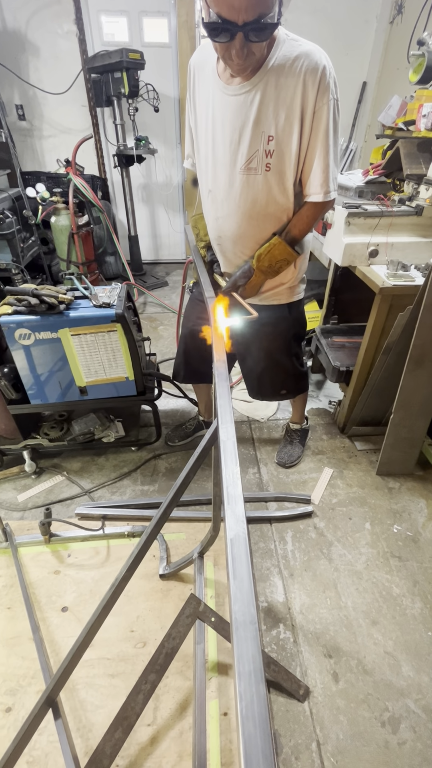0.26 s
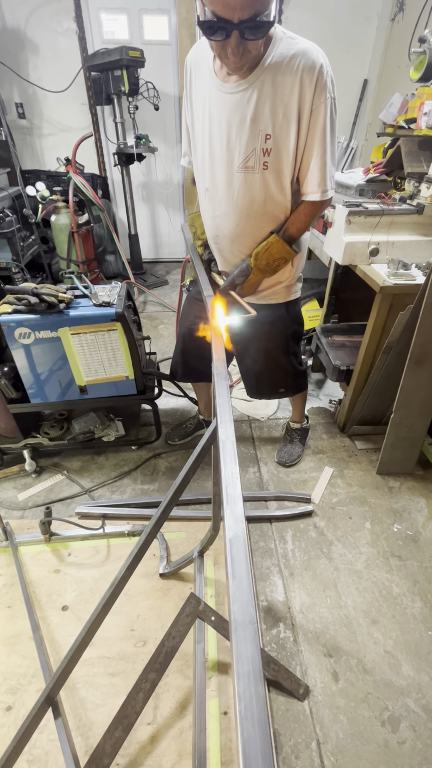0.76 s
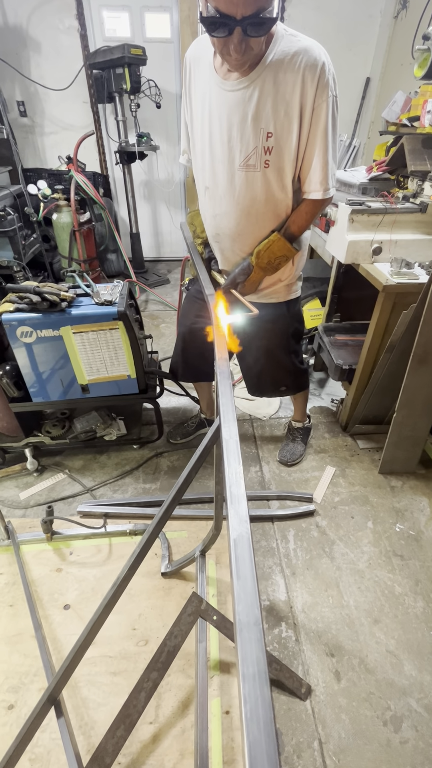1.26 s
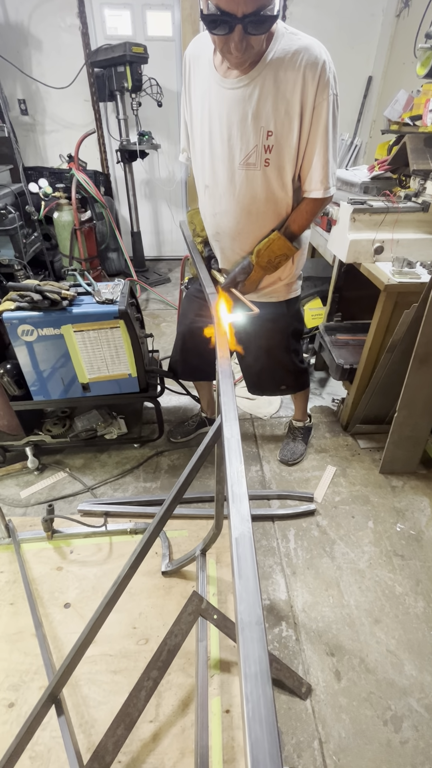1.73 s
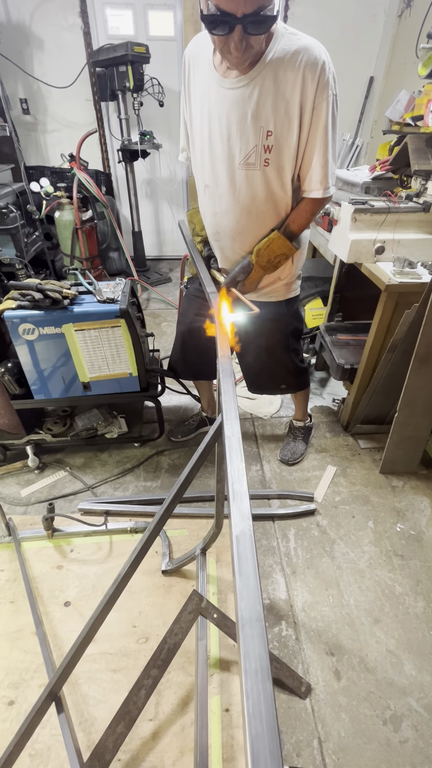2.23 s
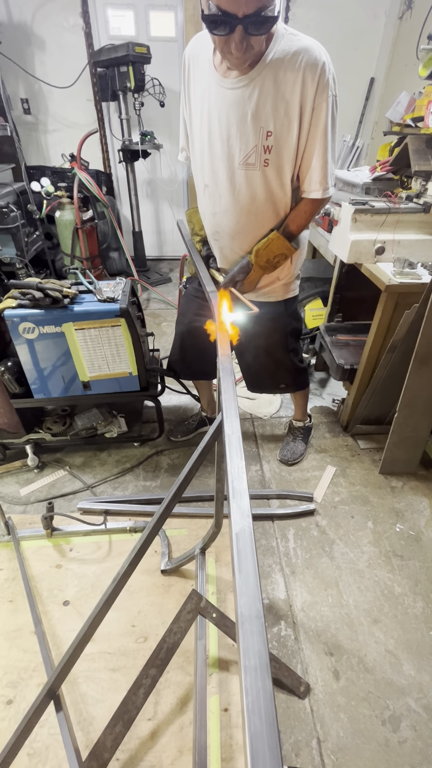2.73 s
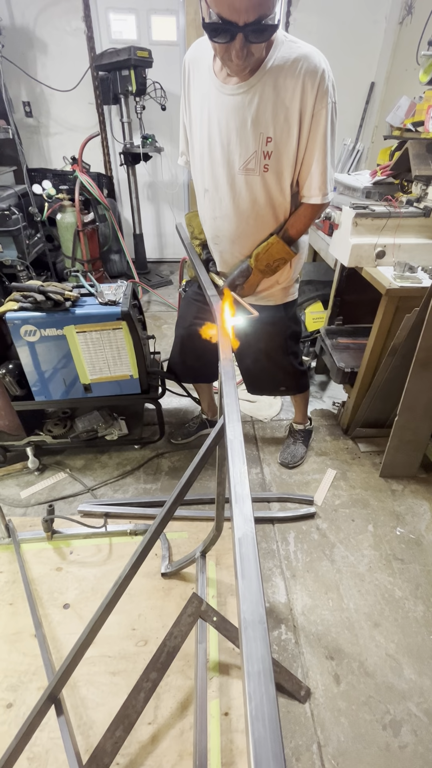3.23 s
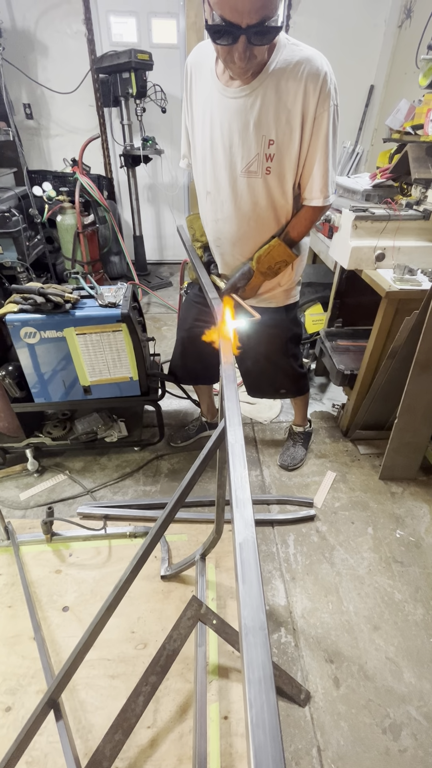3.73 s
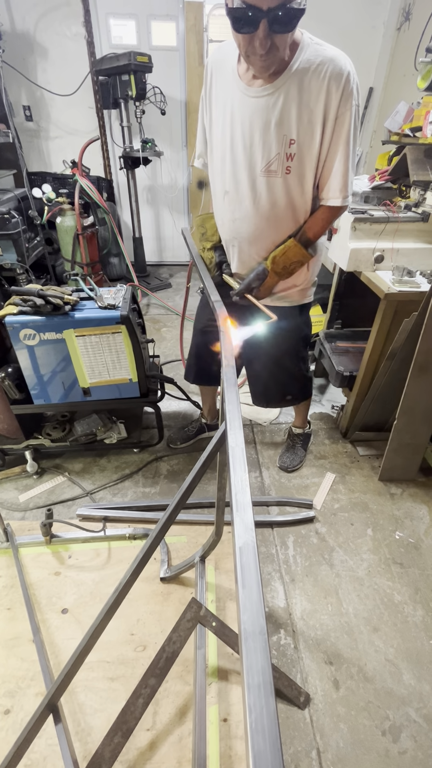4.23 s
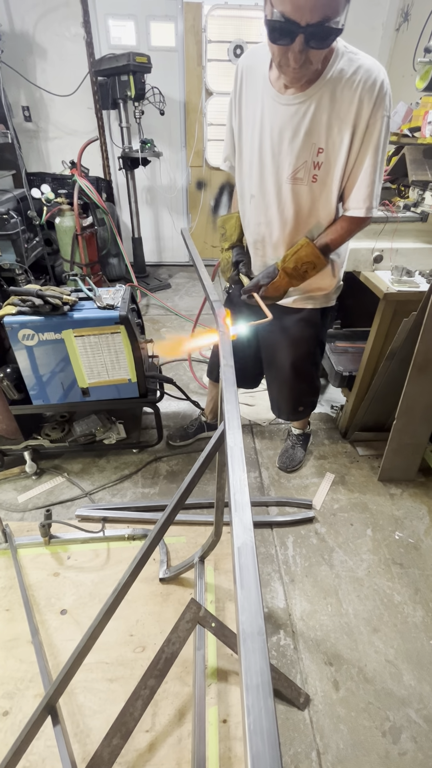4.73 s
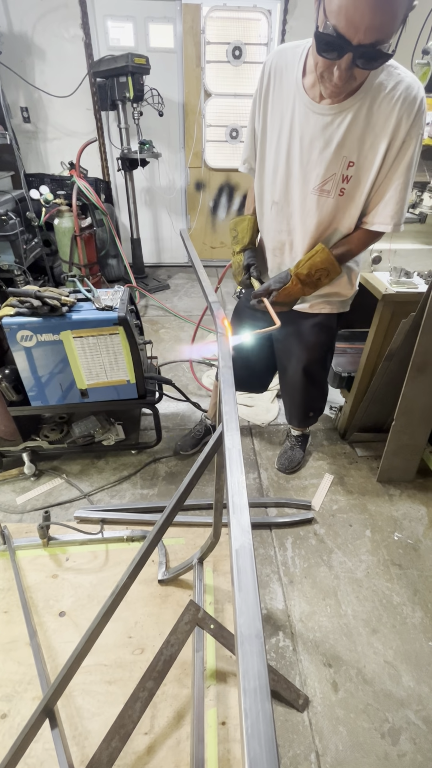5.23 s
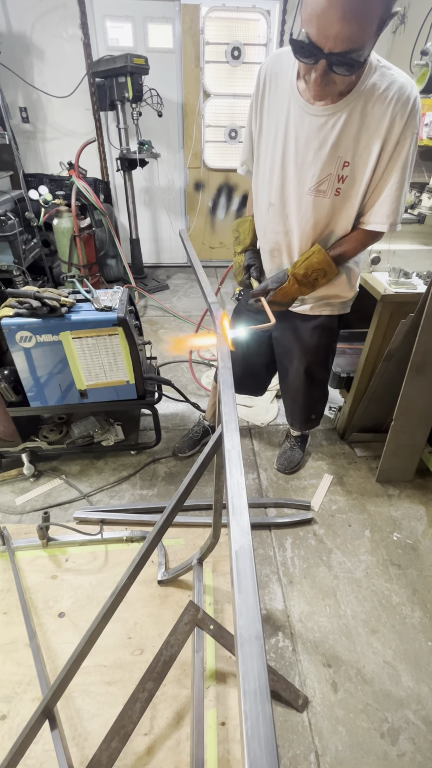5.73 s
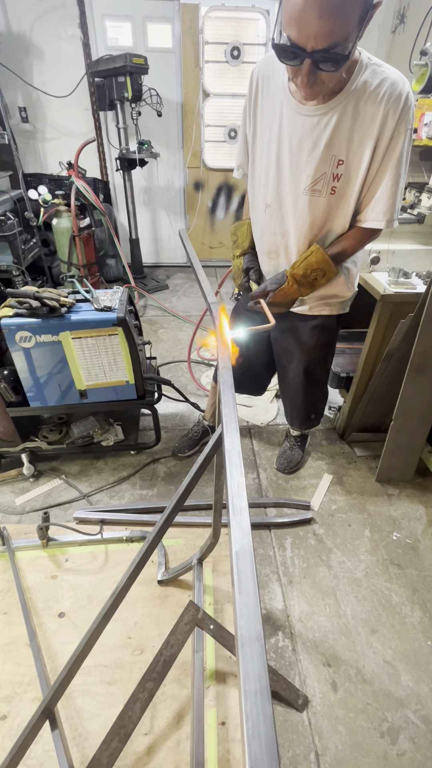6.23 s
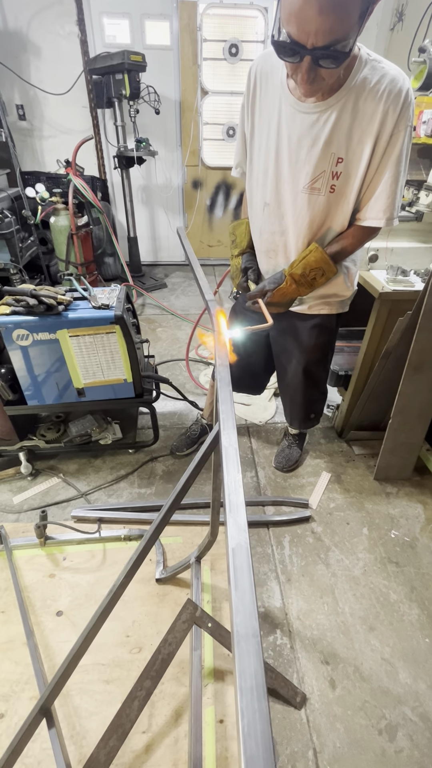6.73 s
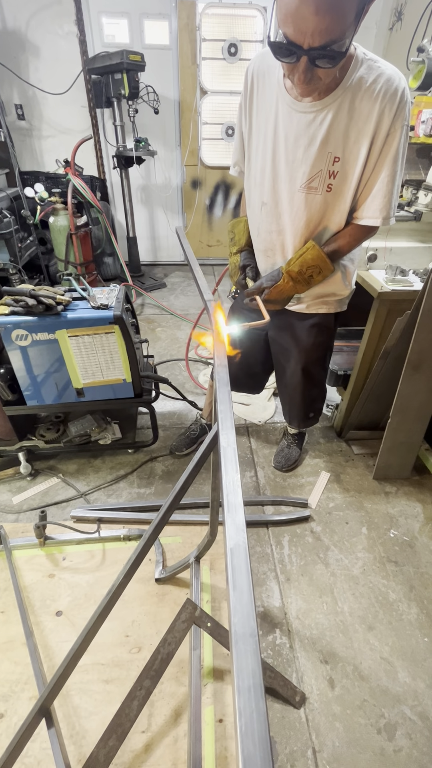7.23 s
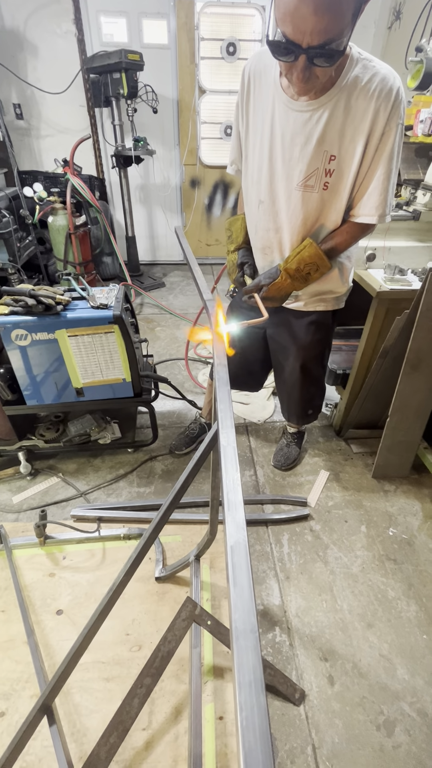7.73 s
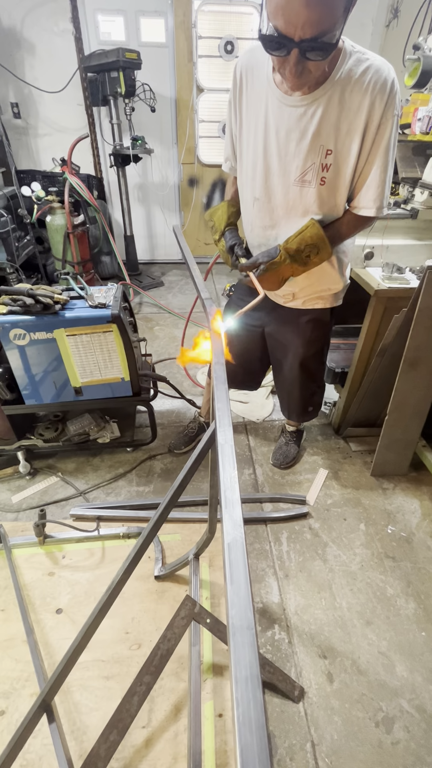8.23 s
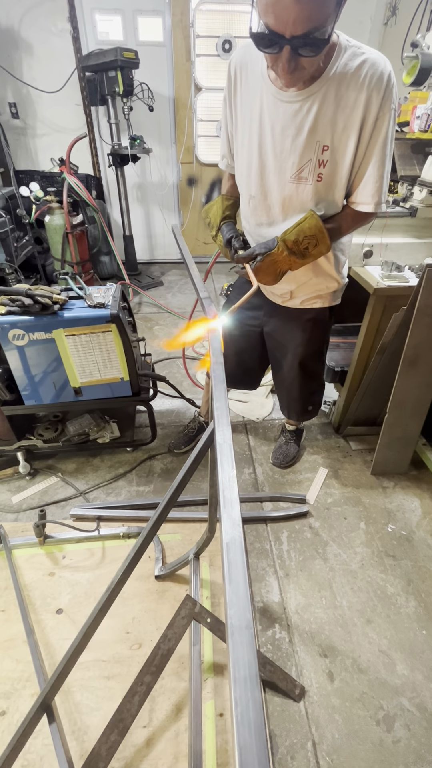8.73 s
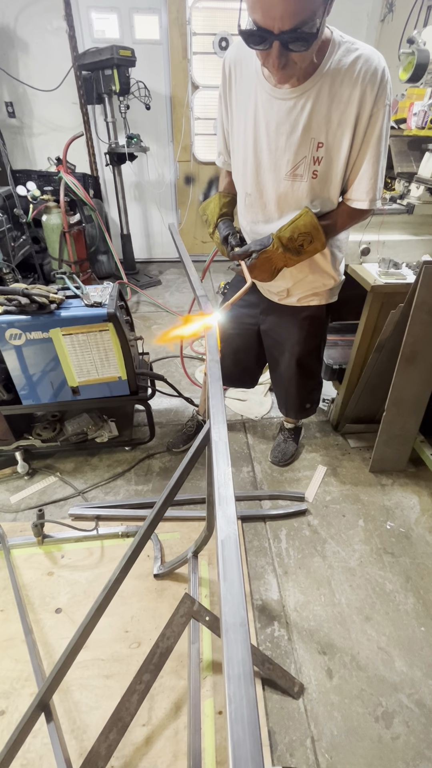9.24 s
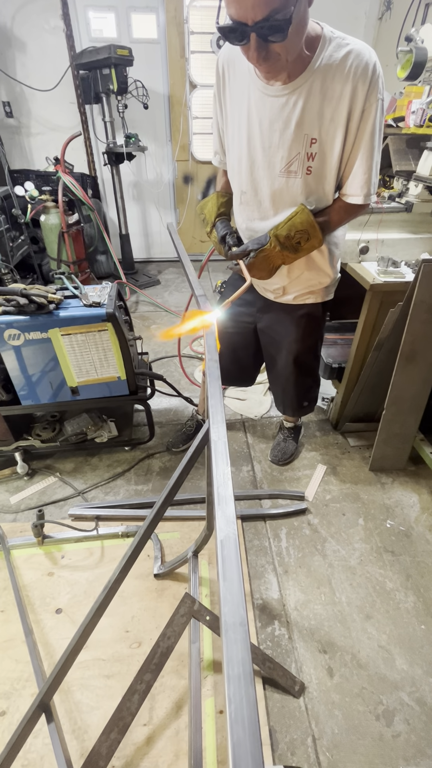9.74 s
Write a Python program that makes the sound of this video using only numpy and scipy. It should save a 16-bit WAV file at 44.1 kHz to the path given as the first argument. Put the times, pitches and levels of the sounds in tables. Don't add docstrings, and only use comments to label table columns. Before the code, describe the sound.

A gas torch burns without pause for about ten seconds, close to a small stereo microphone in a hard-walled workshop. A bright, wide hiss and high sizzle from the nozzle cover a low, gently fluttering roar and a mid-range splash of flame on steel. From 0 to 4 s it is fairly steady, with a small puff near 2 s; a distant engine drops in pitch and fades by about 1.2 s. Around 4 to 6 s the torch is moved: roar and splash swell in gusts and the hiss changes colour with shifting echoes. It then settles, slightly brighter. At about 8.1 s comes a strong whooshing flare, then quick sizzling spurts, sharpest near 8.9 s. Very faint short tones ring from the tube, mostly near 1, 2.9 and 5 s. A low fan hum lies beneath, and another far engine drones unsteadily from 6.3 s to the end.

```python
import sys
import numpy as np
from scipy import signal
from scipy.fft import rfft, irfft, next_fast_len
from scipy.io import wavfile
from scipy.ndimage import uniform_filter1d, map_coordinates

SR = 44100
rng = np.random.default_rng(int(sys.argv[2]) if len(sys.argv) > 2 else 0)


def digitize_waveform(pressure):
    field = np.atleast_2d(pressure).T
    bounded = np.clip(field, -1, 1)
    quanta = np.round(bounded * 32767).astype(np.int16)
    wavfile.write(sys.argv[1], SR, quanta)


def ratio(d):
    e = np.asarray(d, float) / 20
    return 10 ** e


N = 439677


def unit(x):
    return x / np.sqrt(np.mean(x ** 2) + 1e-20)


def along(points, hz):
    point_hz, *columns = np.transpose(points)
    return [np.interp(np.log(hz + 1), np.log(point_hz + 1), column) for column in columns]


def curves(rows):
    at_s, *columns = np.transpose(rows)
    return [np.interp(np.arange(N) / SR, at_s, column) for column in columns]


def bumps(rows):
    centre_s, half_s, *columns = np.transpose(rows)
    t = np.arange(0, N + 64, 64) / SR
    bell = np.exp(-((t[:, None] - centre_s) / np.abs(half_s)) ** 2)
    return [np.interp(np.arange(N) / SR, t, bell @ column) for column in columns]


def wobble(rate_hz):
    knots = rng.standard_normal(N // 256)
    return map_coordinates(knots, [np.arange(N) * rate_hz / SR])


def turned():
    from_s, to_s = 2.6, 6.1
    return np.interp(np.arange(N) / SR, [from_s, to_s], [0, 1])


def turbulence(gain, ports, patchy_db):
    z = signal.stft(rng.standard_normal((2, N)), nperseg=512)[2]
    patches = uniform_filter1d(rng.standard_normal(z.shape[1:]), size=8, axis=0)
    patches = uniform_filter1d(patches, size=12, axis=1)
    pair = signal.istft(z * ratio(patchy_db * unit(patches)), nperseg=512)[1]

    m = next_fast_len(N + 8192)
    hz = np.fft.rfftfreq(m, 1 / SR)
    likeness, lead_rad, balance_db = ports(hz)
    mix_angle = np.arccos(np.clip(likeness, 0, 1)) / 2
    a, b = rfft(pair, m) * gain(hz) * [np.cos(mix_angle), np.sin(mix_angle)]
    side = ratio(balance_db / 2) * np.exp(-.5j * lead_rad)
    return unit(irfft([(a + b) * side, (a - b) / side], m)[:, :N])


def engine(rows):
    # centre_s, half_length_s, change_db
    shadows = [(.7, 0.043, -15), (.895, .025, -18), (6.52, 0.038, -10), (6.69, .03, -7), (7.41, .05, -7),
               (7.84, 0.047, -10), (8.62, .08, -4), (9.07, .05, -10), (9.42, 0.11, -11), (9.75, 0.049, -8)]
    hz, level_db = curves(rows)
    t = np.arange(N) / SR
    start_s, end_s = rows[0][0], rows[-1][0]
    fade_in = np.clip((t - start_s) / .08 + (start_s == 0), 0, 1)
    fade_out = np.clip((end_s - t) / .08, 0, 1)
    level_db = level_db + bumps(shadows)[0] + 1.5 + 1.0 * wobble(13)
    return fade_in * fade_out * ratio(level_db) * np.sin(2 * np.pi * np.cumsum(hz) / SR)


def engines():
    # time_s, pitch_hz, level_db
    leaving = [(0.0, 79.6, -38), (0.24, 78.2, -38.5), (0.59, 75.9, -35), (0.77, 68, -39), (0.86, 68.4, -38),
               (0.94, 60.7, -40), (1.05, 60.2, -44), (1.2, 60, -55)]
    # time_s, pitch_hz, level_db
    passing = [(6.3, 54.8, -52), (6.45, 51.3, -38), (6.75, 49.2, -41.5), (7.5, 50.5, -39),
               (7.92, 50.7, -46), (8.05, 54.6, -41), (8.37, 54.8, -38.5), (9.16, 58.4, -41),
               (9.97, 58.5, -43)]
    # time_s, pitch_hz, level_db
    idling = [
        (0.0, 47, -54),
        (0.4, 46, -48),
        (0.95, 45, -51),
    ]
    return engine(leaving) + engine(passing) + engine(idling)


def fan():
    # pitch_hz, width_hz, level_db
    lines = [(165.5, 2.5, -41), (194.2, .6, -40.5)]
    t = np.arange(N) / SR
    hum = np.zeros(N)
    for pitch_hz, width_hz, level_db in lines:
        drift = np.cumsum(rng.standard_normal(N)) * np.sqrt(2 * np.pi * width_hz / SR)
        swell = ratio(1.4 * wobble(3))
        hum += ratio(level_db) * swell * np.sin(2 * np.pi * pitch_hz * t + drift)
    return hum * ratio([[-.8], [.8]])


def tube():
    # start_s, length_s, pitch_hz, level_db, right_minus_left_db
    songs = [(.57, 0.22, 712, -40, 2), (.8, 0.426, 705, -38.5, 0), (2.82, 0.373, 700, -38.5, -7),
             (4.8, 0.31, 708, -41, 0), (5.5, 0.173, 703, -39, 0), (.56, 0.31, 353, -39, 7),
             (0.11, 0.37, 2150, -52, -11), (3.5, 0.14, 2180, -47, -3), (7.05, 0.655, 2180, -52, -12)]
    out = np.zeros((2, N))
    waver = wobble(25)
    for start_s, length_s, pitch_hz, level_db, pan_db in songs:
        t = np.arange(round(length_s * SR)) / SR
        start = round(start_s * SR)
        at = slice(start, start + len(t))
        hz = pitch_hz * (1 - .018 * (t / length_s - .5) + .003 * waver[at])
        note = np.sqrt(np.sin(np.pi * t / length_s)) * np.sin(2 * np.pi * np.cumsum(hz) / SR)
        out[:, at] += ratio(level_db + np.array([[-pan_db], [pan_db]]) / 2) * note
    return out


def jet():
    # frequency_hz, density_db_per_hz
    hiss_spectrum = [(2400, -14), (3200, -10.5), (4300, -6), (5000, -2), (6000, -0.5), (7200, -2),
                     (8600, -1.5), (10000, -3.5), (12000, -24.5)]
    sizzle_spectrum = [(7500, -35), (9200, -7), (10500, 0), (12300, -.5), (14000, -1), (14700, -3),
                       (16000, -3)]
    # frequency_hz, likeness_0_to_1, right_leads_rad, left_minus_right_db
    jet_ports = [(2700, .6, 3.3, -.5), (3050, .2, 4.9, -2.5), (4000, .3, 4.6, -2.2), (4420, .5, 3.2, -1.5),
                 (5100, .58, 4.3, .3), (5550, .57, 3.2, 1.5), (6300, .54, 2.8, .5), (7000, .6, 2, -1.7),
                 (8000, .4, .4, -.8), (9300, .76, -1.95, -.7), (10120, .87, -3.14, -.7),
                 (12600, .94, -6.35, -.2), (14750, .92, -9.42, 0), (15700, .85, -10.7, -.3)]
    # centre_s, half_length_s, sizzle_gain_db
    spurts = [(1.0, .2, .8), (4.3, .15, 2), (5.0, 0.18, 3), (5.4, 0.086, 2.5), (8.32, .05, 3),
              (8.45, 0.066, 4), (8.65, 0.1, 1.2), (8.93, 0.047, 7.5), (9.12, .06, 5), (9.65, .25, 0)]

    spurt_db, = bumps(spurts)
    ports = lambda hz: along(jet_ports, hz)
    hiss = turbulence(lambda hz: ratio(along(hiss_spectrum, hz)[0]), ports, patchy_db=-0.4)
    sizzle = turbulence(lambda hz: ratio(along(sizzle_spectrum, hz)[0]), ports, patchy_db=0.66)

    flutter_db = 0.2 * wobble(6.5) + 0.2 * wobble(17)
    hiss_db = -33 + 1.17 * turned() + 0.23 * spurt_db + 0.1 * wobble(3.3)
    sizzle_db = -31 + 1.6 * turned() + spurt_db + 0.4 * wobble(4)
    return ratio(hiss_db + flutter_db) * hiss + ratio(sizzle_db + flutter_db) * sizzle


def flame():
    # frequency_hz, density_db_per_hz
    roar_spectrum = [(22, -45), (40, -10.5), (80, -6), (150, -1.5), (300, -4), (480, -4.5), (750, -6),
                     (1100, -16.5), (1800, -50)]
    splash_spectrum = [(500, -20), (800, -2), (1100, -4.5), (1500, -8), (2200, -5.5), (2800, -7),
                       (3500, -27.5), (5000, -33)]
    # centre_hz, width_hz, gain_db
    resonances = [(130, 17, 3), (267.5, 14, 3), (296, 10.5, 4.5), (333, 7.5, 7.5), (379.5, 19, -4),
                  (431, 39, 7.5), (478, 16, 5.5), (509, 7, -1), (546, 16, 2), (590, 24, 5.5),
                  (696, 15, 6.5), (757, 27, -0.5), (808, 23, 6), (860, 35, -9), (940, 35, 1.5),
                  (1028, 25, 6.5), (1382, 210, 3.5)]
    # frequency_hz, likeness_0_to_1, right_leads_rad, left_minus_right_db
    flame_ports = [(60, .996, .06, -.7), (250, .96, .22, -1.8), (450, .9, .75, -2), (620, .55, 1.8, -3.5),
                   (800, .25, 3.3, -3.5), (1000, .55, 4.5, -3), (1450, .68, 5.3, 1), (2100, .72, 4.3, 4),
                   (2650, .8, 3.14, 0), (3000, .2, 4.4, -2)]
    # centre_s, half_length_s, roar_gain_db, splash_gain_db
    flares = [(1.9, .08, 2.5, .5), (2.17, .08, 1.5, 0), (3.9, .07, 2, .3), (4.2, 0.087, 2.5, -2.5),
              (4.6, 0.35, 5, 2), (4.9, 0.058, 5, 3), (5.12, 0.14, 4.5, 4.5), (5.6, 0.49, 4, 3),
              (8.09, 0.17, 7.5, 7), (8.38, 0.071, 3, 1.5), (9.38, .1, 2, 0.5)]

    flare_db, spread_db = bumps(flares)
    roar_db = -32.5 - 1.5 * turned() + flare_db + 0.85 * wobble(4.6) + 0.66 * wobble(14)
    splash_db = -40 + 1 * turned() + spread_db + 0.45 * wobble(7)

    shop = lambda hz: ratio(sum(db / (1 + (2 * (hz - c) / w) ** 2) for c, w, db in resonances))
    ports = lambda hz: along(flame_ports, hz)
    roar = turbulence(lambda hz: ratio(along(roar_spectrum, hz)[0]) * shop(hz), ports, patchy_db=-0.5)
    splash = turbulence(lambda hz: ratio(along(splash_spectrum, hz)[0]) * shop(hz), ports, patchy_db=0.5)

    deep_hz, thins_db_per_db = 287, 0.62
    deep = signal.sosfiltfilt(signal.butter(2, deep_hz, fs=SR, output="sos"), roar)
    thinned = roar - deep + ratio(-thins_db_per_db * spread_db) * deep
    return ratio(roar_db) * thinned + ratio(splash_db) * splash


def walls(x, ripple_db, width_hz):
    # time_s, comb_patterns_passed
    travel = [(0, 1), (3.7, 1.4), (5, 4), (6.1, 5.5), (7.7, 6.2), (8.5, 8), (10, 9.5)]
    hz, t, z = signal.stft(x, SR, nperseg=2048)
    patterns_passed = np.interp(t, *np.transpose(travel))
    place = np.meshgrid(hz / width_hz, patterns_passed, indexing="ij")
    patterns = rng.standard_normal((3, 1024, 12))
    common, left, right = [map_coordinates(pattern, place) for pattern in patterns]
    streaks = common + .6 * np.array([left, right])
    comb = ratio(ripple_db * (hz[:, None] > 1100) * streaks)
    return signal.istft(z * comb, nperseg=2048)[1][:, :N]


def scene():
    torch = walls(flame() + jet(), ripple_db=1.8, width_hz=55)
    return engines() + fan() + tube() + torch


def thin_out(x):
    bands = np.r_[96, 108, 120, 132, 144, 160, 176, 196, 216, 240, 264, 292, 320:737:32]
    pair = np.array([x[0] + x[1], x[0] - x[1]]) / 2
    z = signal.stft(pair, window="cosine", nperseg=2048)[2]
    for lo, hi in zip(bands[:-1], bands[1:]):
        stronger = np.sqrt(np.mean(abs(z[:, lo:hi]) ** 2, axis=1).max(axis=0))
        floor = stronger * ratio(-6.5 + rng.standard_normal(len(stronger)))
        z[:, lo:hi] *= abs(z[:, lo:hi]) > floor
    z[:, 732:] = 0
    mid, side = signal.istft(z, window="cosine", nperseg=2048)[1][:, :N]
    return np.array([mid + side, mid - side])


def band_limit(x):
    return signal.sosfilt(signal.butter(12, 16200, fs=SR, output="sos"), x)


def record(dry):
    mix = thin_out(dry)
    return band_limit(mix)


dry = scene()
out = record(dry)
digitize_waveform(out)
```